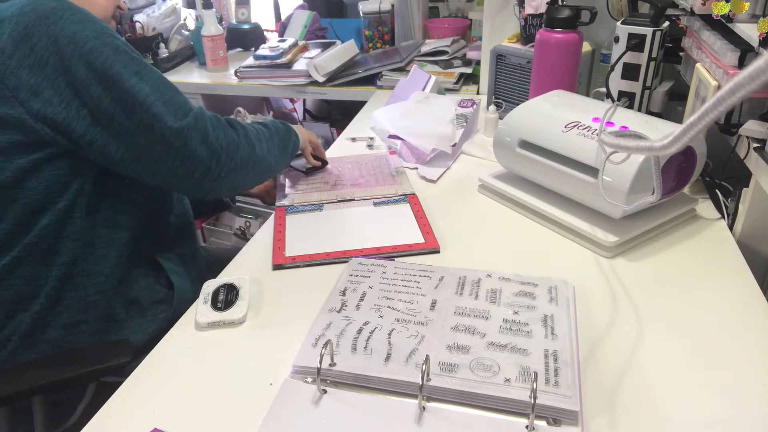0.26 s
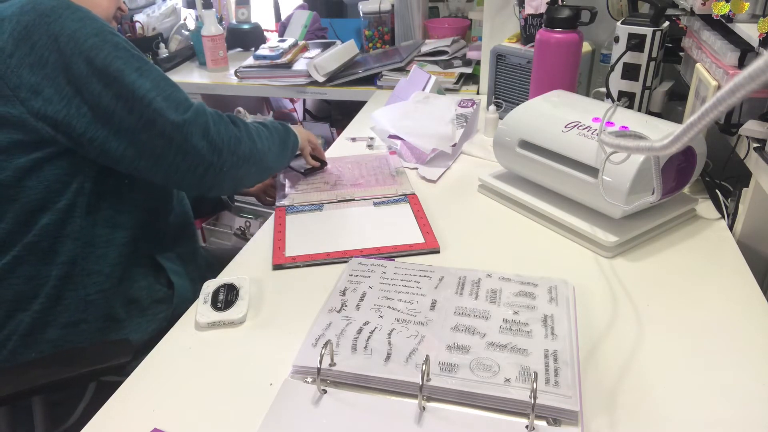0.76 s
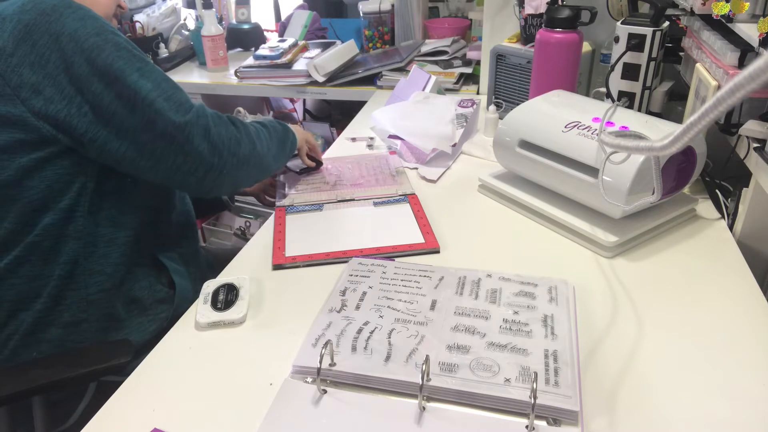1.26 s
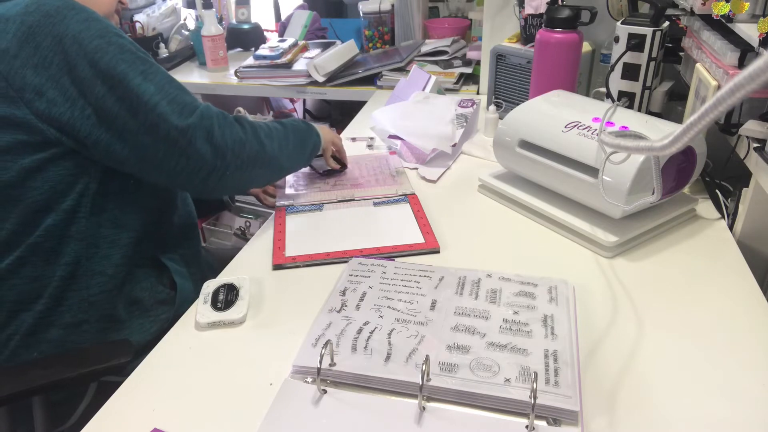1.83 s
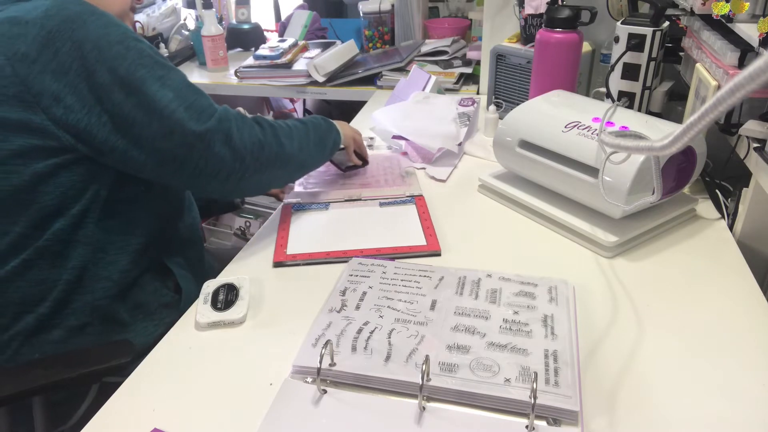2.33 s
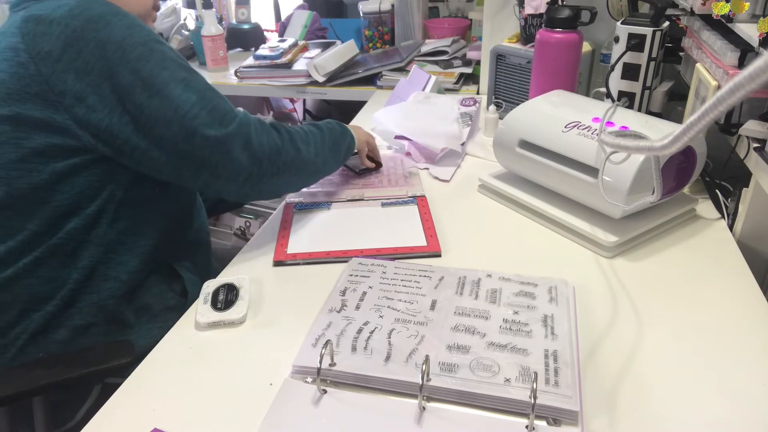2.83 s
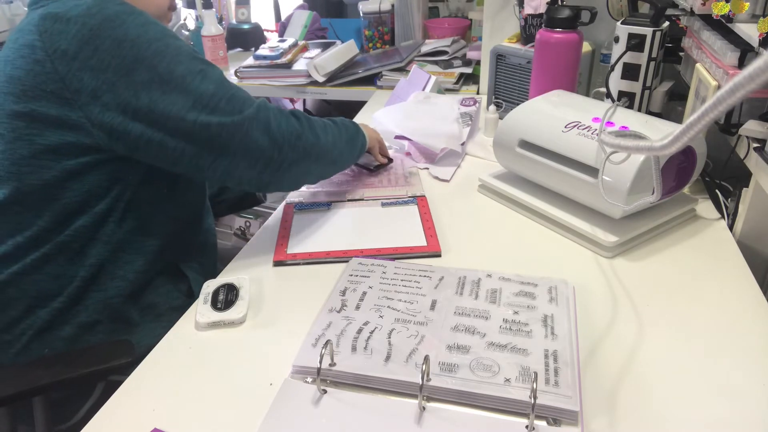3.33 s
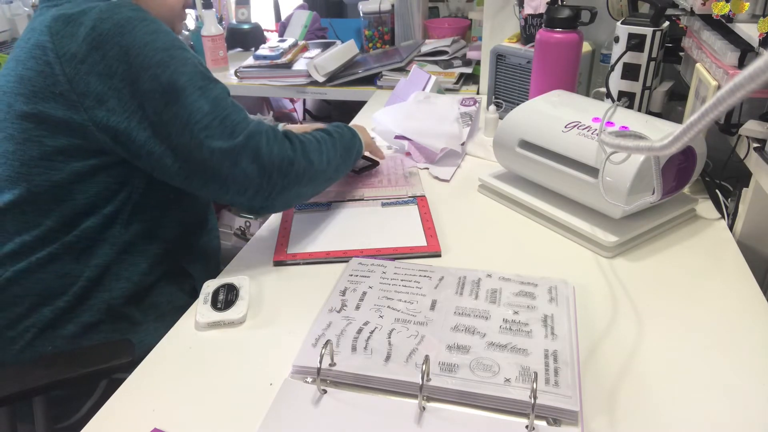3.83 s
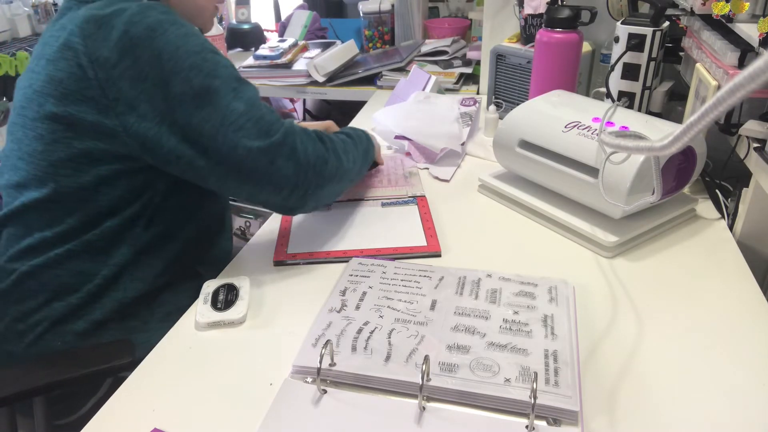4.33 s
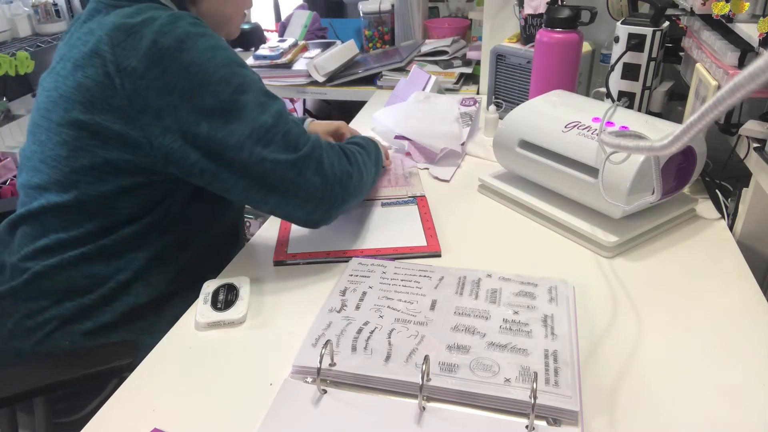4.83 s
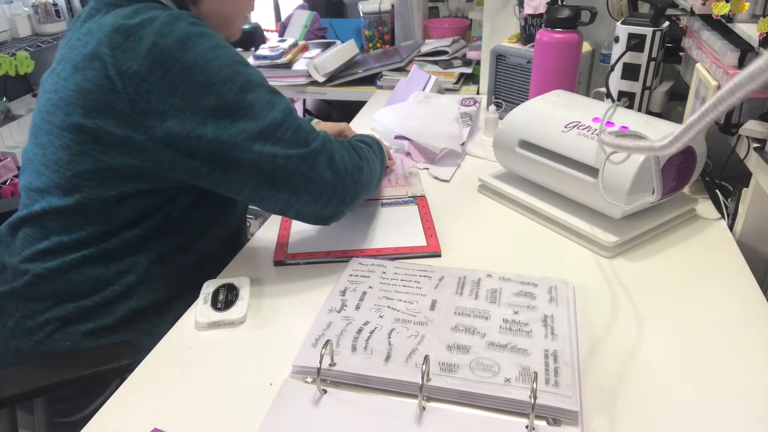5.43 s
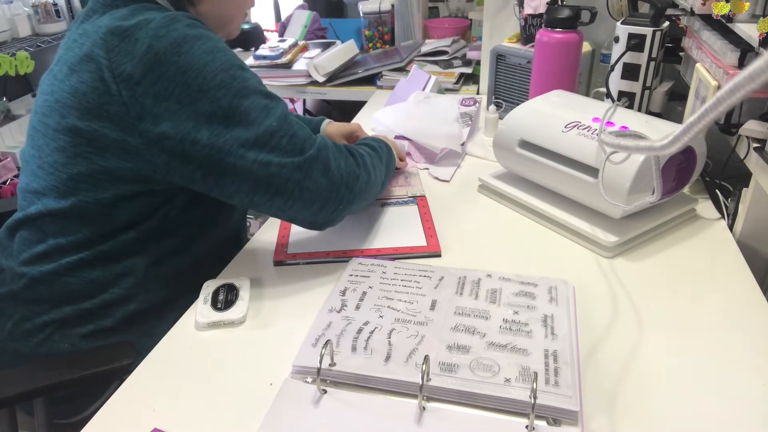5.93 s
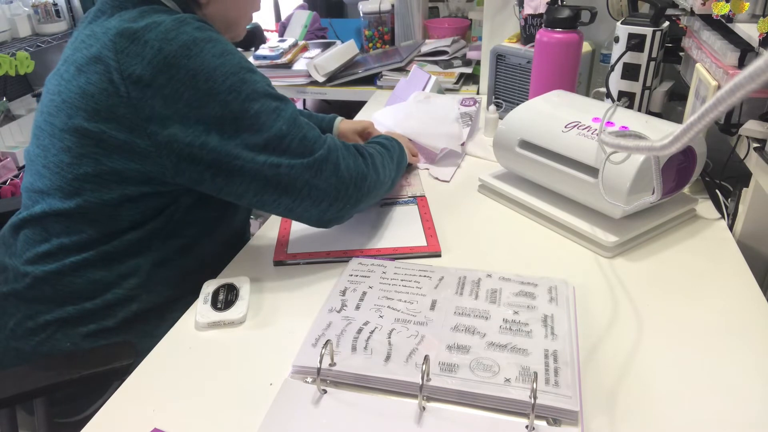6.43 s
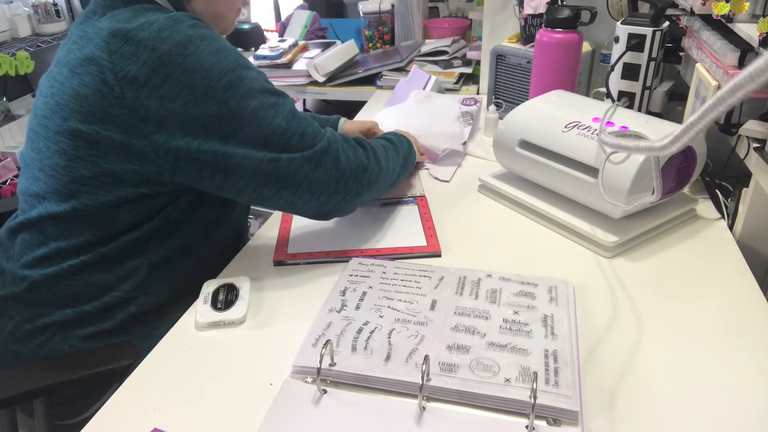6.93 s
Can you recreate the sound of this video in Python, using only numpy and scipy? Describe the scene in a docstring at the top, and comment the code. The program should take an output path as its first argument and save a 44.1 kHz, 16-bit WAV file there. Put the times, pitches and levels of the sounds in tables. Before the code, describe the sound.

Irregular muffled dabs thump a desk while a tacky pad peels off with crisp little snaps, plus occasional plastic clacks and brief rubbing.

```python
"""In a small room, a small ink pad is dabbed on clear stamps on a plastic plate on a desk.
Each press thuds through the desk's resonances; each lift peels the tacky pad off with snaps of crackle.
The plastic case clacks and clicks now and then, shaped noise slides on the plate and rubber squeaks faintly.
Short decaying noise tails answer as the room, over faint air, motor hum and a sway too low to hear."""
import sys
import numpy as np
from scipy import signal
from scipy.fft import rfft, irfft, next_fast_len
from scipy.io import wavfile
from scipy.ndimage import map_coordinates

SR = 44100
rng = np.random.default_rng(int(sys.argv[2]) if len(sys.argv) > 2 else 0)


def to_wav(s):
    """Save 16-bit WAV."""
    ch = np.atleast_2d(s).T  # columns
    pcm = np.round(np.clip(ch, -1, 1) * 32767)  # PCM
    wavfile.write(sys.argv[1], SR, pcm.astype(np.int16))


N = 315756
TOP_HZ = 15850  # upper band limit
SIZE = 2 ** 15  # samples given to one contact
HZ = np.fft.rfftfreq(SIZE, 1 / SR)
AGE = np.arange(SIZE) / SR  # seconds since the contact


def amp(db):
    """Decibels to gain."""
    return 10 ** (np.asarray(db) / 20)


def unit(x):
    """Scale to rms 1."""
    return x / np.sqrt(np.mean(x ** 2) + 1e-20)


def along(points, hz):
    """Read (frequency [Hz], value) points on a log frequency axis."""
    point_hz, values = np.transpose(points)
    return np.interp(np.log(hz + 1e-3), np.log(point_hz), values)


def octaves(hz, pivot_hz, low_hz, high_hz):
    """Octaves above the pivot, level outside low..high."""
    return np.log2(np.clip(hz, low_hz, high_hz) / pivot_hz)


def wobble(rate):
    """A smooth random curve, rate knots a second."""
    knots = rng.standard_normal(int(N * rate / SR) + 4)
    return map_coordinates(knots, [np.arange(N) * rate / SR])


def swell(t, s, length):
    """Half a sine from s to s + length, zero elsewhere."""
    return np.abs(np.sin(np.pi * np.clip((t - s) / length, 0, 1)))


def filtered(x, response):
    """x times a response of frequency."""
    m = next_fast_len(N + SR // 2)
    return irfft(rfft(x, m) * response(np.fft.rfftfreq(m, 1 / SR)), m)[:N]


def noise(spectrum):
    """Coloured noise of rms 1."""
    return unit(filtered(rng.standard_normal(N), lambda hz: amp(along(spectrum, hz))))


def colour(points, tilt_db=0):
    """Causal (minimum-phase) response with the gain of (frequency [Hz], level [dB]) points plus a tilt."""
    cepstrum = irfft(np.log(amp(along(points, HZ) + tilt_db) + 1e-6))
    # folding the cepstrum onto positive time puts the energy at the onset
    cepstrum[1:SIZE // 2] *= 2
    cepstrum[SIZE // 2 + 1:] = 0
    return np.exp(rfft(cepstrum))


def ringing(modes, ring_db):
    """A body's direct sound plus its resonances, each a little different at every contact."""
    response = 1
    for centre, width, db in modes:
        gain = amp(ring_db + db + rng.normal(0, 1.5))
        response = response + gain * 1j * HZ * width / (centre * centre - HZ ** 2 + 1j * HZ * width)
    return response


def burst(rise, t60, spiky):
    """Spectrum of a crackle that swells and dies quickly, energy 1; spiky above 1 leaves fewer, larger cracks."""
    x = rng.standard_normal(SIZE)
    cracks = np.sign(x) * np.abs(x) ** spiky
    cracks = cracks * (1 - np.exp(-(AGE / rise) ** 2)) * amp(-60 * AGE / t60)
    return rfft(cracks / np.linalg.norm(cracks))


# decay of the small room: (frequency [Hz], time to fall 60 dB [s])
ROOM_DECAY = [(60, 0.4), (160, 0.23), (420, 0.12), (1100, 0.13), (2500, 0.16), (6000, 0.17), (15000, 0.17)]


def room(gap):
    """Spectrum of a fresh room tail of energy 1 that builds up over gap seconds."""
    hz, t, z = signal.stft(rng.standard_normal(SIZE), SR, nperseg=256)
    decay = amp(-60 * t / along(ROOM_DECAY, hz)[:, None])
    tail = signal.istft(z * decay, SR, nperseg=256)[1][:SIZE]
    tail *= 1 - np.exp(-(AGE / gap) ** 2)
    return rfft(tail / np.linalg.norm(tail))


def add(track, s, spectrum):
    """Put one contact into the track at s seconds."""
    start = max(round(s * SR), 0)
    sound = irfft(spectrum)[:min(SIZE // 2, N - start)]
    track[start:start + len(sound)] += sound


# colour of the room air: (frequency [Hz], relative level [dB])
AIR_COLOUR = [(15, -30), (30, -33.5), (42, -16.5), (55, -21), (80, -30.5), (145, -29), (200, -40),
              (260, -38), (330, -45.5), (420, -41), (510, -51), (1000, -52), (2500, -60), (9000, -60.5),
              (16000, -68.5)]
# tones of the motor: (frequency [Hz], level [dB])
MOTOR_TONES = [(258.4, -71.5), (393.0, -76)]
# colour of the very low sway: (frequency [Hz], relative level [dB])
SWAY_COLOUR = [(1, -34.5), (3, 0), (5, 3), (7, 1.5), (10, -17.5), (20, -19.5), (30, -42), (50, -82)]


def background(air_db=-59, sway_db=-32.0, drift=0.082):
    """Noise of the room air, motor tones whose phase drifts (radians), and a sway strongest at a few Hz."""
    t = np.arange(N) / SR
    hum = sum(amp(db) * np.sin(2 * np.pi * hz * t + drift * wobble(9.6)) for hz, db in MOTOR_TONES)
    air = amp(air_db) * noise(AIR_COLOUR)
    sway = amp(sway_db) * noise(SWAY_COLOUR)
    return air + hum + sway


# rubber slips: (time [s], length [s], pitch [Hz], level [dB])
RUBBER_SLIPS = [(0.06, 0.12, 2000, -74), (0.788, 0.11, 1890, -74), (1.26, .07, 2000, -79),
                (5.493, .06, 5300, -76), (6.776, 0.037, 975, -61), (6.77, 0.041, 1290, -60),
                (6.939, 0.081, 1000, -67)]


def squeaks(waver=.06, flutter_db=3):
    """Thin tones of rubber sticking and slipping, unsteady in pitch and level."""
    clock = np.cumsum(1 + waver * wobble(270)) / SR  # time that runs unevenly
    flutter = amp(flutter_db * wobble(77))
    t = np.arange(N) / SR
    tones = sum(amp(db) * swell(t, s, length) * np.sin(2 * np.pi * hz * clock)
                for s, length, hz, db in RUBBER_SLIPS)
    return flutter * tones


# colour of a snap of ink: (frequency [Hz], level [dB])
SNAP_COLOUR = [(90, 8), (300, 25.5), (650, 22), (1800, 20.5), (4600, 17.5), (10500, 15.5), (16000, 6.5)]
# resonances of the desk and the plate on it: (frequency [Hz], width [Hz], relative level [dB])
DESK_MODES = [(50.8, 12.3, 5.5), (99.6, 21, -1.5), (139, 32, -2), (244.7, 39, 2), (327.8, 18.3, 3),
              (411.4, 16, 4.5), (635.6, 6.9, -2), (803, 10, -8), (1260, 13, -28), (1720, 11, 0),
              (1700, 23, 1), (2230, 210, 0), (2560, 210, -6.5), (2703, 23, 4), (4100, 48, 1), (4480, 62, 2)]


def snap(db, brightness, wet_db=2):
    """Sticky ink snaps free: a sharp crack that the room stretches."""
    tone = colour(SNAP_COLOUR, brightness * octaves(HZ, pivot_hz=4600, low_hz=428, high_hz=10500))
    crack = burst(rise=0.0012, t60=0.008, spiky=1.27) + amp(wet_db) * room(gap=0.00079)
    return amp(db) * tone * ringing(DESK_MODES, ring_db=-4.0) * crack


# lifts, where one edge tears loose, the pad clings, then pops free:
# (time [s], tear level [dB], tear brightness [dB per octave], cling [s], pop level [dB])
PAD_LIFTS = [(1.4222, -41.5, 1, 0.035, -46), (1.8843, -48, 3, 0.041, -40.5), (2.6609, -45, 3, 0.029, -43.5),
             (2.9648, -39.5, 2.5, .0483, -41.5), (3.2952, -43.5, 1, .045, -40),
             (3.574, -48, 1, .1239, -40.5), (4.3783, -38.5, 2.5, 0.029, -40.5),
             (4.9387, -43.5, 0.5, .0861, -42), (5.5923, -38, 2, 0.027, -40.5),
             (6.0929, -41, 0, .0662, -40.5), (6.666, -58, -2.5, 0.054, -41.5)]
# single spots of ink let go as the pad rocks, plus two faint taps near 4.07 and 4.15 s that sound alike: (time
# [s], level [dB], brightness [dB per octave])
INK_SPOTS = [(.1649, -45.5, -4), (.27, -56, 3), (.7787, -54, -0.5), (.9524, -55, 3.5), (1.2398, -50, 1),
             (1.6681, -53, 5.2), (1.9098, -42.5, 3), (2.1436, -49.5, 3), (2.2587, -50, 2),
             (2.5066, -55.5, -1.5), (2.8303, -39.5, 0.7), (3.481, -63.5, 9), (3.6123, -54.5, 3),
             (4.0656, -65.5, -5), (4.148, -61.5, -4.5), (4.354, -46, 0.8), (6.061, -52, 4),
             (7.131, -56, 3.5)]


def peels(pop_db_per_oct=-1.3):
    """Every lift tears, clings and pops, the pop usually duller; lone spots of ink and two faint taps snap as
    well."""
    out = np.zeros(N)
    for s, tear_db, brightness, cling, pop_db in PAD_LIFTS:
        add(out, s, snap(tear_db, brightness))
        add(out, s + cling, snap(pop_db, pop_db_per_oct))
    for s, db, brightness in INK_SPOTS:
        add(out, s, snap(db, brightness))
    return out


# presses: (time [s], relative strength [dB], thud pitch [Hz], softness [dB lost per octave above that pitch])
PRESSES = [(.258, -36, 79.5, 7), (.302, -38, 69.6, 6), (0.546, -64.5, 151, 1), (0.674, -40.5, 63.5, 6.5),
           (0.715, -46.5, 72.5, 5), (1.139, -37, 95, 2.5), (1.666, -39.5, 86, 5.5), (2.426, -35, 108, 3),
           (2.817, -38, 418, 10.5), (2.824, -28, 63, 3), (3.1815, -22.5, 76.5, 1.9), (3.545, -37.5, 165, 3),
           (3.731, -32, 330, 10.5), (4.636, -35, 83, 1.5), (5.126, -44.5, 148, 11), (5.145, -30.5, 384, 13),
           (5.837, -48, 75, 4), (6.387, -33.5, 440, 11.5), (6.398, -34, 90, 4), (6.882, -44, 63.4, 5)]
# colour of a press before its softness: (frequency [Hz], level [dB])
THUD_COLOUR = [(15, 38.5), (55, 46.5), (100, 44.5), (145, 47.5), (200, 41.5), (310, 39), (450, 36.5),
               (750, 37), (1900, 29.5), (6000, 22.5), (16000, 8.5)]


def dabs(bass_lag=0.0535, bend_hz=55, split_hz=600, squash=0.009, usual_db=-35.0, felt_db=-13,
         bass_db_per_oct=6.5, thud_wet_db=-7, crush_wet_db=-1):
    """The soft face lands first, then the pad bottoms out, bends the desk and presses the plate flat."""
    out = np.zeros(N)
    # low bending waves travel slowest (bass_lag seconds late), so every thud falls in pitch
    bending = np.exp(-2j * np.pi * bass_lag * bend_hz * np.arctan(HZ / bend_hz))
    low = 1 / (1 + 1j * HZ / split_hz) ** 2
    high = (1j * HZ / split_hz) ** 2 * low
    soft = colour([(80, -6.5), (160, 4), (300, 5.0), (700, -17), (4000, -37)])
    for s, db, pitch_hz, softness in PRESSES:
        above = octaves(HZ, pitch_hz, low_hz=58, high_hz=6000)
        weight = colour(THUD_COLOUR, np.where(above < 0, bass_db_per_oct, -softness) * above)
        blow = amp(db) * weight * bending * ringing(DESK_MODES, ring_db=0)
        push = low * (1 + amp(thud_wet_db) * room(gap=0.0097))
        # the harder the press, the sooner its foam is squashed flat
        slowness = min(amp(usual_db - db), 1.5)
        # the treble comes from many small contacts spread over a few milliseconds
        contacts = burst(rise=0.0043 * np.sqrt(slowness), t60=0.014, spiky=1.7)
        crush = high * (contacts + amp(crush_wet_db) * room(gap=0.0058))
        add(out, s, blow * (push + crush))
        # squash [s] is the head start of the soft face in a usual press
        add(out, s - squash * slowness, amp(felt_db) * blow * soft * push)
    return out


# the hard rim of the case clicks on the plate: (time [s], relative level [dB])
RIM_CLICKS = [(1.4218, -33), (4.9455, -37.5)]
# colour of the rim: (frequency [Hz], level [dB])
RIM_COLOUR = [(200, 9), (1800, 1), (3200, 9), (4700, 22.5), (6500, 11.5), (11000, 12), (16000, 2)]


def clicks(wet_db=1):
    """Hard plastic on hard plastic: a short, narrow, high click."""
    out = np.zeros(N)
    for s, db in RIM_CLICKS:
        crack = burst(rise=0.00061, t60=0.0079, spiky=1.3) + amp(wet_db) * room(gap=0.0049)
        add(out, s, amp(db) * colour(RIM_COLOUR) * crack)
    return out


# colour of a slide: (frequency [Hz], relative level [dB])
SLIDE_COLOUR = [(120, 2), (270, 4), (450, -3), (700, -0.5), (950, 2.5), (1300, -7.5), (1900, -2.5),
                (3200, -8.5), (6000, -14), (15000, -26.5)]
# slides on the plate: (time [s], length [s], relative peak level [dB], brightness [dB per octave])
SLIDES = [(2.121, 0.43, -62.5, 3), (4.03, 0.24, -74.5, 3), (5.493, 0.095, -64.5, -6),
          (5.883, .15, -66.5, -.4), (6.467, 0.093, -69.5, -1.5), (6.76, 0.07, -64, 0.5),
          (6.879, .19, -63, -0.5), (7.104, 0.072, -64.5, 0)]


def rubbing(grain_db=-0.5, grit_db=1.5, pivot_hz=2000, fullness=0.94):
    """Pad and fingers slide on the plate with a gritty hiss, bright or dull from stroke to stroke."""
    catching = unit(amp(grain_db * wobble(60) + grit_db * wobble(700)))
    hz, t, z = signal.stft(noise(SLIDE_COLOUR) * catching, SR, nperseg=256)
    above = octaves(hz, pivot_hz, low_hz=170, high_hz=TOP_HZ)[:, None]
    # each stroke swells and fades as half a sine raised to the power of its fullness
    strokes = sum(amp(db + brightness * above) * swell(t, s, length) ** fullness
                  for s, length, db, brightness in SLIDES)
    return signal.istft(z * strokes, SR, nperseg=256)[1][:N]


# tiny dry ticks: (time before the common delay [s], relative level [dB])
DRY_TICKS = [(3.2566, -34.5), (4.559, -49), (5.8802, -44.5)]


def ticks(level_db=14, delay=0.0014):
    """Single sharp impulses, coloured, without any room tail; delay in seconds."""
    out = np.zeros(N)
    for s, db in DRY_TICKS:
        tone = colour([(100, 11.5), (3000, 5), (9000, 1.5), (16000, -14)])
        add(out, s + delay, amp(db + level_db) * tone)
    return out


# the hard case touches the plate: (time [s], relative level [dB])
CASE_CLACKS = [(4.766, -56), (4.808, -33.5), (6.782, -51.5), (7.13, -45)]
# colour of the case: (frequency [Hz], relative level [dB])
CASE_COLOUR = [(150, -3), (350, -4.5), (800, -3), (1400, -11.5), (2000, -8.5), (2900, -15), (3900, -23),
               (9000, -37), (16000, -51)]
# resonances of the hollow case: (frequency [Hz], width [Hz], relative level [dB])
CASE_MODES = [(810, 55, -6), (1166, 73, 2), (1800, 170, 6), (2350, 150, 4.5), (2840, 280, 1.5)]


def clacks(level_db=26, ring_db=5, wet_db=-3):
    """A crackle excites the hollow plastic case, which rings briefly."""
    out = np.zeros(N)
    for s, db in CASE_CLACKS:
        shell = colour(CASE_COLOUR) * ringing(CASE_MODES, ring_db)
        crack = burst(rise=0.00079, t60=0.079, spiky=1.36) + amp(wet_db) * room(gap=0.01)
        add(out, s, amp(db + level_db) * shell * crack)
    return out


def scene():
    """Everything at the desk, mixed to one channel."""
    contacts = peels() + dabs() + clicks() + ticks() + clacks()
    return (background() + squeaks() + contacts + rubbing())[None]


def record(dry):
    """A steep low-pass removes what lies above the band limit."""
    return filtered(dry[0], lambda hz: 1 / (1 + (hz / TOP_HZ) ** 160))[None]


dry = scene()
out = record(dry)
to_wav(out)
```